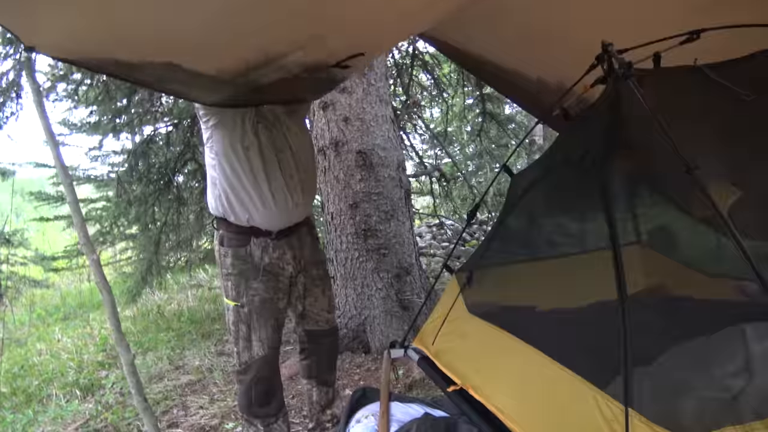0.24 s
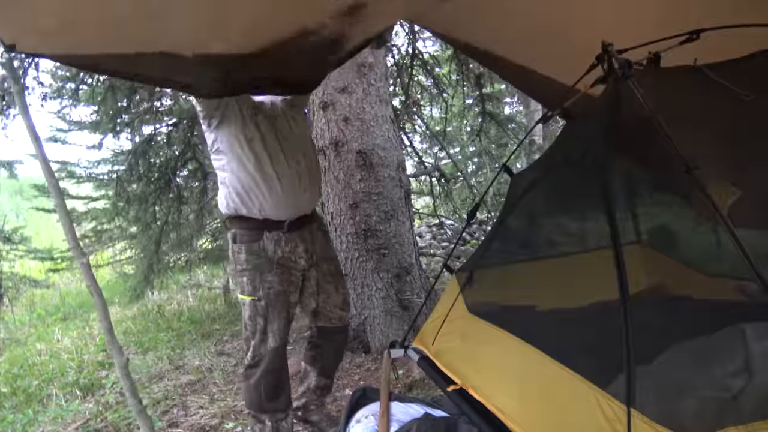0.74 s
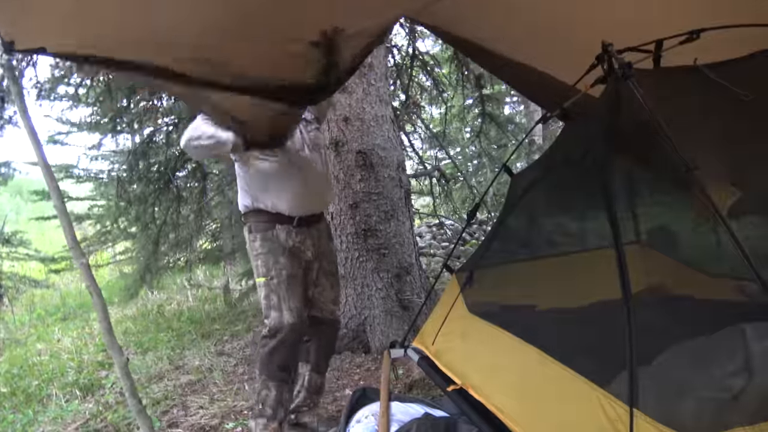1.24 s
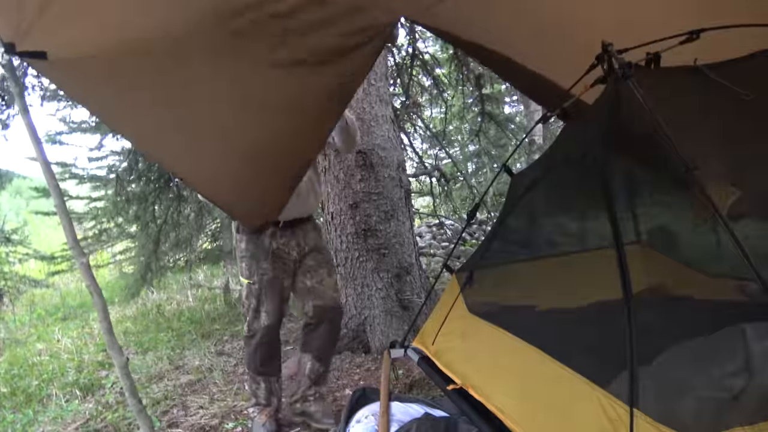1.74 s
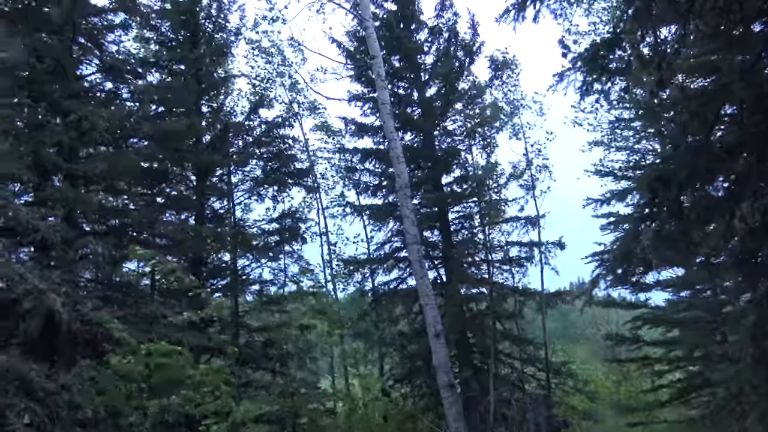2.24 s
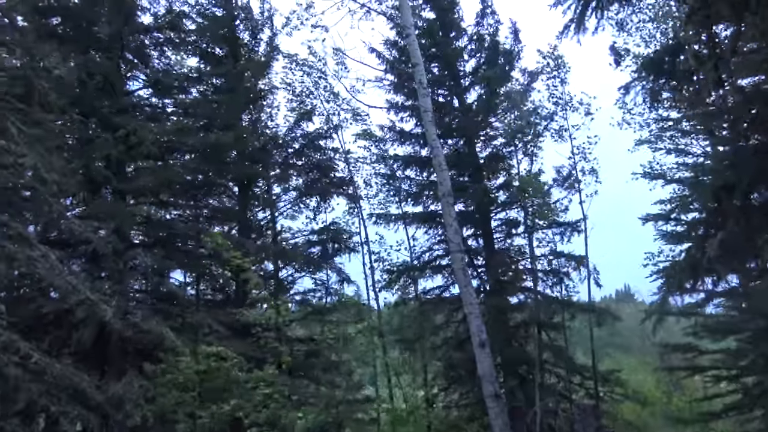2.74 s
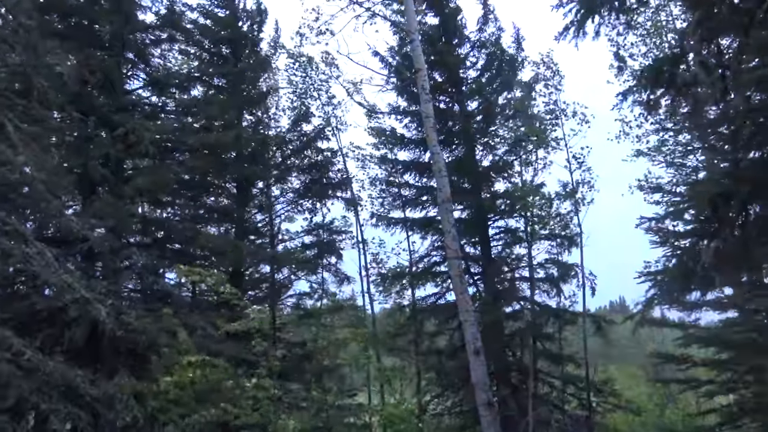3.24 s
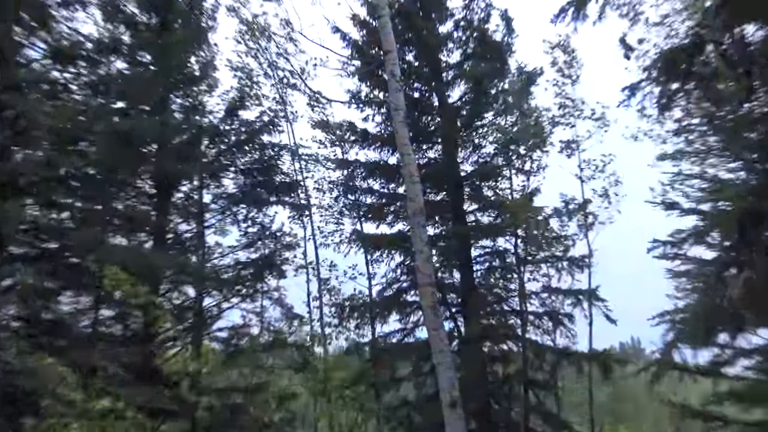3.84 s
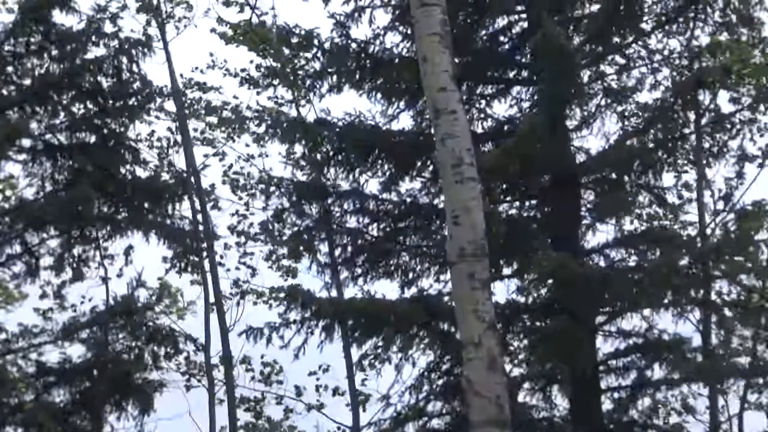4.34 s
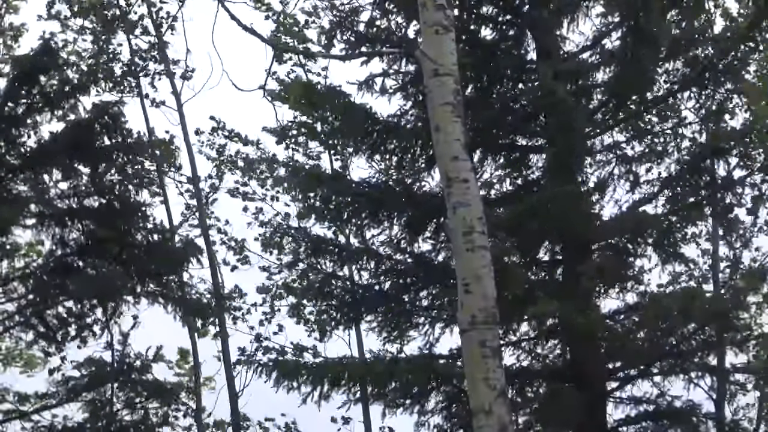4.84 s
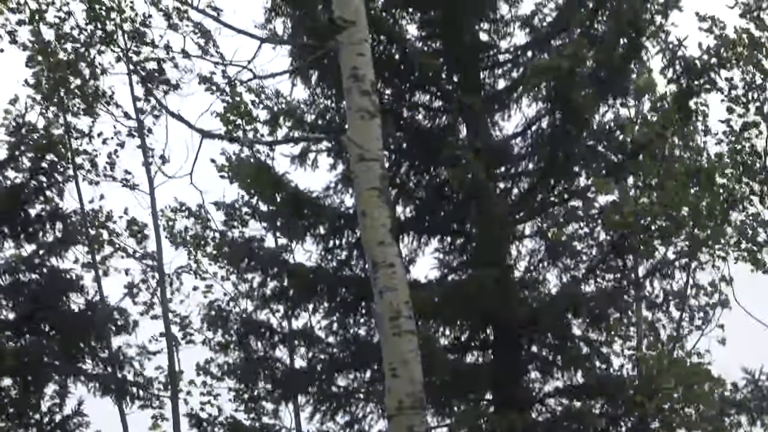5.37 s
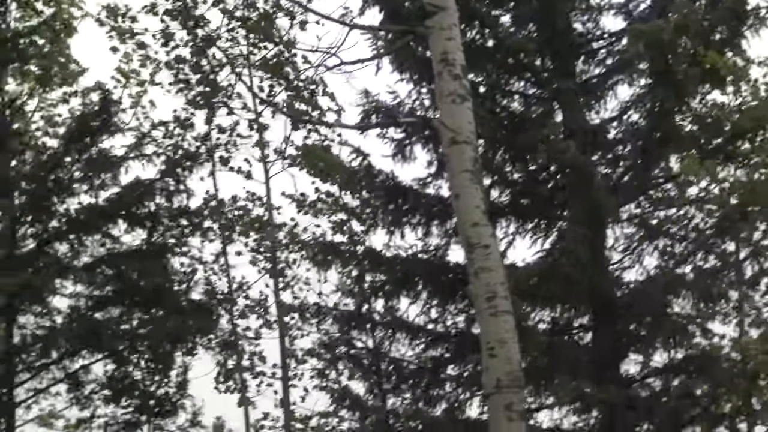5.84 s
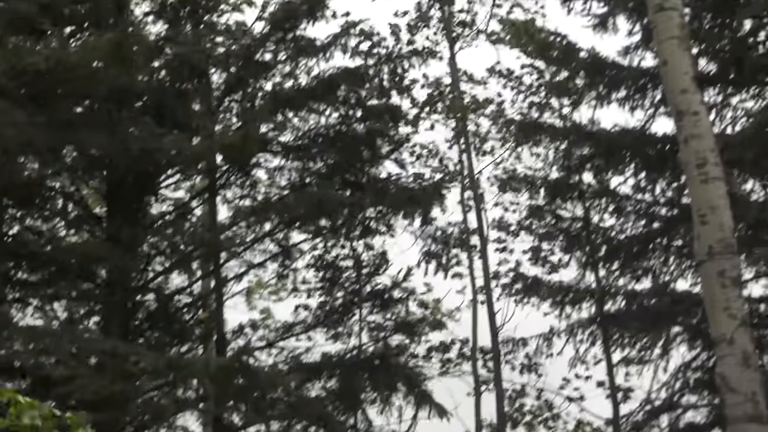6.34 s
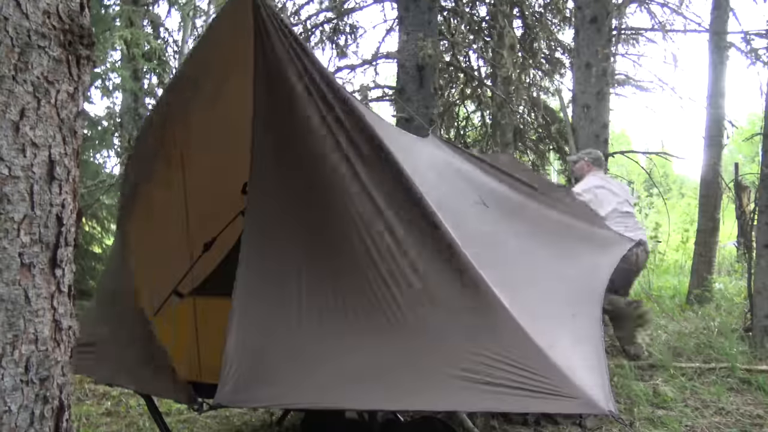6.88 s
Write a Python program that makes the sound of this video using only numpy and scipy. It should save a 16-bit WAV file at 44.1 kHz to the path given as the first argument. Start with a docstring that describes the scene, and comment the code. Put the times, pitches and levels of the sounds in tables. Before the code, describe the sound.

Under a tarp in a spruce wood, muffled wind and low draught rumble; faint cloth swishes, then one dry, thudding flap. Abruptly the open trees roar and hiss much louder. Gusts build deep fluttering rumble on the unshielded microphone, peaking in one overwhelming blast, then easing quickly to steady rushing. It ends beside a tent, similar but slightly softer.

```python
"""Storm wind in a spruce wood

Heard in turn from under a tarp, among the open trees and beside a tent. Noise in drifting patches makes
the boughs roar; with added random ticks it makes needles and aspen leaves hiss. Turbulent low noise, led by
draught and gusts, buffets the microphone until one big gust drives its limiter. Under the tarp bell-shaped
noise swells make the cloth swish, and a loosened corner flaps once in a quick cluster of pressure thuds."""
import sys
import numpy as np
from scipy import signal
from scipy.fft import rfft, irfft, next_fast_len
from scipy.io import wavfile
from scipy.ndimage import uniform_filter1d, minimum_filter1d, map_coordinates

SR = 44100
rng = np.random.default_rng(int(sys.argv[2]) if len(sys.argv) > 2 else 0)


def unload_wav(signal):
    """Save mono or channel-first audio to the path in sys.argv[1] as 16-bit WAV at rate SR, clipped to [-1, 1]."""
    wavfile.write(
        sys.argv[1],
        SR,
        np.round(np.clip(np.atleast_2d(signal).T, -1, 1) * 32767).astype(np.int16),
    )


N = 313551

INTO_OPEN, BESIDE_TENT = 2.151, 6.6  # when the microphone's place changes (s)
SWAY_DB, SWAY_PER_S = 0.1, 9  # the boughs sway about the wind strength: depth, knots a second
GUST_ATTACK_S, GUST_RELEASE_S = 0.028, 0.06  # time to rise and fall by a factor e
HEAVE_DB, HEAVE_GROWS = -2, 0.74  # large eddies in a gust of 0 dB; dB they gain per dB of gust
LUMPY_DB, LUMPS_PER_S = 1.6, 10  # the draught arrives in uneven lumps: depth, knots a second
SHELTER_HZ = 130  # the tarp keeps faster eddies away
TOP_HZ = 15720  # band limit of the finished sound


def amp(db):
    """Decibels to gain."""
    return 10 ** (np.asarray(db) / 20)


def unit(x):
    """Scale to rms 1."""
    return x / np.sqrt(np.mean(x ** 2) + 1e-20)


def colour(points, hz):
    """Gain at each frequency, drawn through (Hz, dB) points on a log axis."""
    f, db = np.transpose(points)
    return amp(np.interp(np.log(hz + 1), np.log(f + 1), db))


def lowpass(hz, edge_hz):
    """Gain of a gentle low-pass."""
    return 1 / np.sqrt(1 + (hz / edge_hz) ** 4)


def clock():
    """Time of each sample in seconds."""
    return np.arange(N) / SR


def by_place(under_tarp, in_open, by_tent):
    """Whichever of the three belongs to the microphone's place at each moment."""
    t = clock()
    return np.select([t < INTO_OPEN, t < BESIDE_TENT], [under_tarp, in_open], by_tent)


def curve(rows):
    """One value per sample, in straight lines between (s, value) points."""
    s, value = np.transpose(rows)
    return np.interp(clock(), s, value)


def wobble(rate):
    """A smooth random curve, rate knots a second."""
    return map_coordinates(rng.standard_normal(256), [clock() * rate], mode="wrap")


def swells(rows):
    """Gain over time of short bell-shaped swells (s, dB, half length s)."""
    t = clock()
    return sum(amp(db) * np.exp(-0.5 * ((t - s) / half) ** 2) for s, db, half in rows)


def filtered(x, response):
    """Shape the spectrum of x by a gain that depends on frequency."""
    m = next_fast_len(N + SR // 2)  # room for the filter to ring out
    spectrum = rfft(x, m) * response(np.fft.rfftfreq(m, 1 / SR))
    return irfft(spectrum, m)[:N]


def noise(spectrum):
    """Coloured noise of rms 1."""
    return unit(filtered(rng.standard_normal(N), lambda hz: colour(spectrum, hz)))


def patchy(depth_db):
    """White noise that swells in patches of time and pitch, as single boughs catch the wind."""
    bins = signal.stft(rng.standard_normal(N), nperseg=512)[2]
    field = rng.standard_normal(bins.shape)
    field = uniform_filter1d(field, size=6, axis=0)  # neighbouring pitches swell together
    field = uniform_filter1d(field, size=18, axis=1)  # and each patch lasts a while
    swelling = bins * amp(depth_db * unit(field))
    return unit(signal.istft(swelling, nperseg=512)[1][:N])


def patter(rate):
    """Leaves touching: random tiny impulses, rate a second."""
    touches = rng.random(N) < rate / SR
    return unit(touches * rng.standard_normal(N))


def trees(wind, spectrum, roar_db, hiss_db, split_hz):
    """One wind strength drives both: boughs roar below the split, needles and pattering leaves hiss above it."""
    def roar_gain(hz):
        return colour(spectrum, hz) * lowpass(hz, split_hz)

    def hiss_gain(hz):
        return colour(spectrum, hz) * np.sqrt(1 - lowpass(hz, split_hz) ** 2)

    roar = unit(filtered(patchy(depth_db=0.2), roar_gain))
    leaves = patchy(depth_db=0.83) + 0.36 * patter(rate=2500)
    hiss = unit(filtered(leaves, hiss_gain))
    strength = amp(curve(wind) + SWAY_DB * wobble(SWAY_PER_S))
    return strength * (amp(roar_db) * roar + amp(hiss_db) * hiss)


def gusts():
    """Strength over time: each gust rises quickly, holds and dies away; overlapping gusts add in power."""
    # Gusts that reach the microphone. Each row: start of the hold in seconds, hold in seconds, strength in dB.
    gust_rows = [(0.396, 0.18, -24.5), (1.968, .06, -29), (2.446, .13, -29), (3.454, 0.077, -27),
                 (3.934, 0.73, -25.5), (4.624, .58, -18.5), (4.797, 0.061, -15), (5.23, 0.079, -9),
                 (5.413, 0.23, -12), (6.49, 0.036, -29.5)]
    t, power = clock(), 0
    for start, hold, db in gust_rows:
        before = np.maximum(start - t, 0) / GUST_ATTACK_S
        after = np.maximum(t - start - hold, 0) / GUST_RELEASE_S
        power = power + (amp(db) * np.exp(-before - after)) ** 2
    return np.sqrt(power)


def eddies(spectrum, size):
    """Turbulent pressure whose strength is even over stretches of size samples."""
    x = noise(spectrum)
    power = uniform_filter1d(uniform_filter1d(x ** 2, size), size)
    return x / np.sqrt(np.abs(power) + 1e-6)


def buffeting():
    """Draught and gusts drive large eddies that heave and small ones that flutter; direct puffs bluster higher up."""
    # Colours of large eddies, small eddies and puffs. Each row: frequency in Hz, relative level in dB.
    large_colour, small_colour = [(3, -2.5), (10, 3.5), (18, 0), (30, -0.5), (40, -20), (58, -30.5),
                                  (120, -65), (300, -100)], [(24, -5), (40, 2), (60, 0), (85, -9), (125, -12.5),
                                                        (185, -18.5), (300, -33.5), (600, -50), (2000, -86)]
    puff_colour = [(50, -6), (130, 8), (220, -3.5), (350, -4), (600, -17), (2000, -49)]
    # Sharp puffs that hit the microphone head-on. Each row: centre in seconds, rms level at the centre in dB,
    # half length in seconds.
    puff_rows = [(3.45, -25.5, 0.026), (4.61, -27, 0.02), (4.835, -23.5, 0.019), (5.33, -25, 0.023),
                 (5.63, -22.5, 0.011)]
    # Steady draught in large and small eddies. Columns: under the tarp, in the open, beside the tent, all in dB.
    heave_draught, flutter_draught = [-20.5, -28.5, -24.5], [-32.5, -35.5, -35.5]

    gust = gusts()
    lumps_db = LUMPY_DB * wobble(LUMPS_PER_S)
    # draught and gusts add in power
    heave_gain = np.hypot(amp(by_place(*heave_draught) + lumps_db), amp(HEAVE_DB) * gust ** HEAVE_GROWS)
    flutter_gain = np.hypot(amp(by_place(*flutter_draught) + lumps_db), gust)
    heave = heave_gain * eddies(large_colour, size=3600)
    flutter = flutter_gain * eddies(small_colour, size=2200)
    sheltered = filtered(flutter, lambda hz: lowpass(hz, SHELTER_HZ))
    puffs = swells(puff_rows) * noise(puff_colour)
    return heave + by_place(sheltered, flutter, flutter) + puffs


def swishes():
    """Cloth sliding over cloth: thin noise in short swells."""
    # Each row: centre in seconds, rms level at the centre in dB, half length in seconds.
    swish_rows = [(.6, -44, 0.055), (.75, -42, .08), (1.524, -36.5, .006), (1.861, -39, .004)]
    # Colour of the cloth. Each row: frequency in Hz, relative level in dB.
    cloth_colour = [(1000, -13), (4000, 4), (8500, 0), (11000, -5), (13500, -7), (15700, -13)]
    return swells(swish_rows) * noise(cloth_colour)


def snap_taut(s, snap, lead, slack, rustle_db, rustle_t60):
    """The sheet pushes air ahead, stops dead and sucks it back more slowly; its creases rustle briefly."""
    # Colour of the creases. Each row: frequency in Hz, relative level in dB.
    crease_colour = [(100, -12), (300, 9), (1200, -17), (3000, -7), (6000, -20), (15000, -45)]
    t = clock() - s
    fade = np.exp(-np.abs(t) / np.where(t < 0, lead, slack))
    push = -np.tanh(t / snap) * fade  # pressure turns to suction at the stop
    rustle_gain = (t > 0) * amp(rustle_db - 60 * np.abs(t) / rustle_t60)
    return push / np.abs(push).max() + rustle_gain * noise(crease_colour)


def flapping():
    """The falling corner of the slack tarp snaps taut with a dead thud."""
    # Each row: moment of the snap in seconds, peak of its push in dB.
    flap_rows = [(1.4163, -12), (1.4198, -20), (1.428, -28)]
    thuds = 0
    for s, db in flap_rows:
        # all times in seconds
        thud = snap_taut(s, snap=0.0002, lead=0.00045, slack=0.00057, rustle_db=-15, rustle_t60=0.049)
        thuds = thuds + amp(db) * thud
    return thuds


def scene():
    """The three places follow one another; the air tugs at the microphone throughout."""
    # Wind in the trees at each place. Each row: time in seconds, strength in dB.
    tarp_wind, open_wind, tent_wind = [(0, -36), (0.75, -35.5), (1.15, -36.5), (1.45, -36), (1.7, -37.5),
                                       (2.15, -37.5)], [(2.15, -29.5), (3, -29.5), (3.95, -28.5),
                                                          (4.65, -29), (5.4, -32), (6.15, -32.4),
                                                          (6.55, -31.6)], [(6.6, -32)]
    # Colour of the trees at each place. Each row: frequency in Hz, relative level in dB.
    tarp_trees, open_trees, tent_trees = [(60, -7), (260, 0), (500, -1.7), (800, -4), (1300, -4.5),
                                          (2200, -6.5), (4000, -7), (5600, -6.5), (7000, -11.5),
                                          (8500, -11), (10500, -21), (13000, -24.5), (15700, -31)], [(60, -13), (160, 1), (320, 1), (700, -2),
                                                              (1350, -2.5), (2300, -6), (3800, -8),
                                                              (5400, -8.5), (7000, -12.5), (8500, -12),
                                                              (10500, -22.5), (13000, -25), (15700, -32.5)], [(60, 3.5), (250, -3.5),
                                                                                  (700, -4), (1300, -2),
                                                                                  (2300, -5.5), (3800, -8),
                                                                                  (5600, -8), (7000, -11.5),
                                                                                  (8500, -13),
                                                                                  (10500, -20.5),
                                                                                  (13000, -24),
                                                                                  (15700, -34)]

    under_tarp = trees(tarp_wind, tarp_trees, roar_db=2.5, hiss_db=-2.55, split_hz=2600)
    under_tarp = under_tarp + swishes() + flapping()
    in_open = trees(open_wind, open_trees, roar_db=-0.1, hiss_db=-1.2, split_hz=2210)
    by_tent = trees(tent_wind, tent_trees, roar_db=-0.5, hiss_db=-3.3, split_hz=2240)
    return (by_place(under_tarp, in_open, by_tent) + buffeting())[None]


def record(dry):
    """A limiter ducks everything under the biggest eddies, the rest is rounded off, then the band is limited."""
    ceiling, hardness = 1.1, 10  # limiter threshold; sharpness of the rounding towards 1
    needed = np.minimum(1, ceiling / (np.abs(dry[0]) + 1e-9))
    ducking = uniform_filter1d(minimum_filter1d(needed, size=1000), size=800)  # sizes in samples
    held = dry[0] * ducking
    rounded = held / (1 + np.abs(held) ** hardness) ** (1 / hardness)
    return filtered(rounded, lambda hz: hz < TOP_HZ)[None]


dry = scene()
out = record(dry)
unload_wav(out)
```